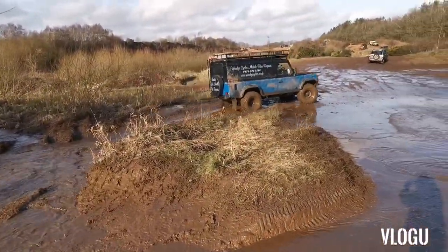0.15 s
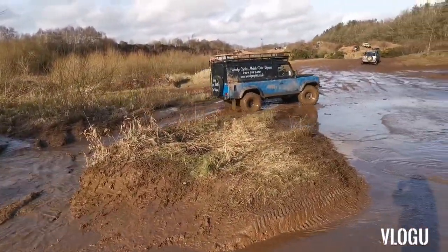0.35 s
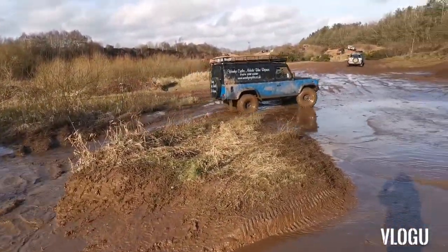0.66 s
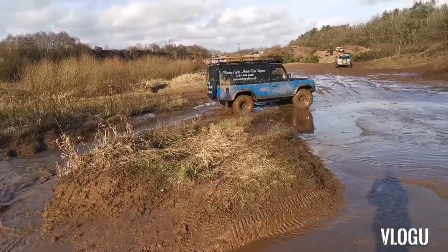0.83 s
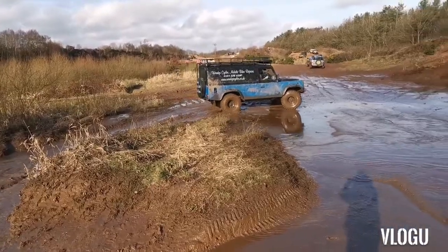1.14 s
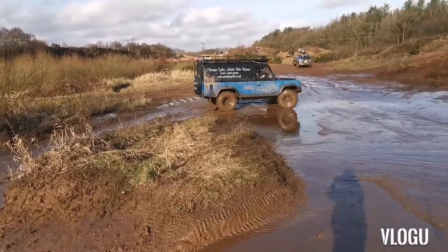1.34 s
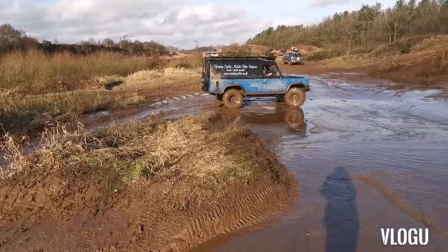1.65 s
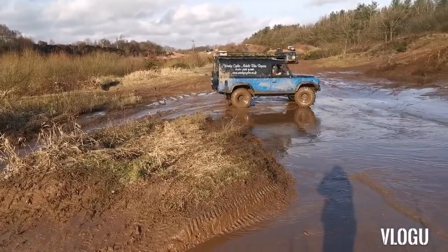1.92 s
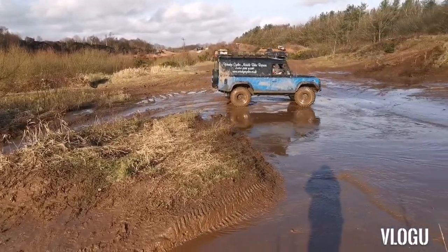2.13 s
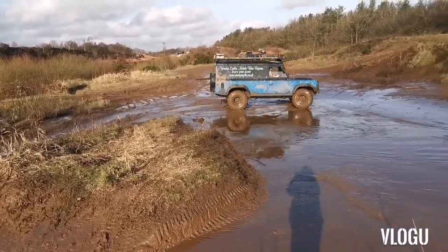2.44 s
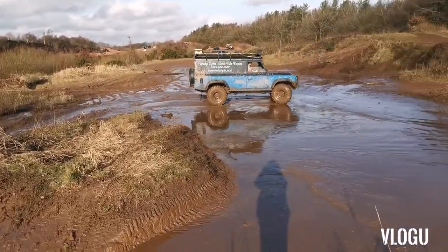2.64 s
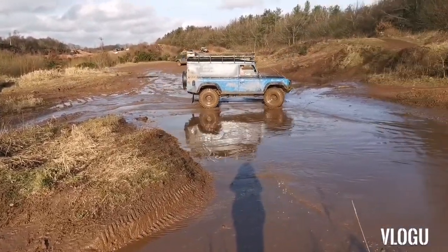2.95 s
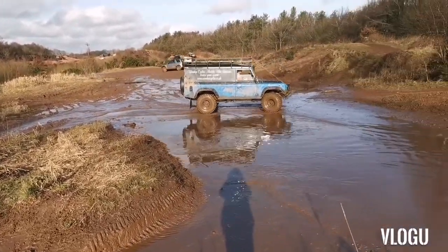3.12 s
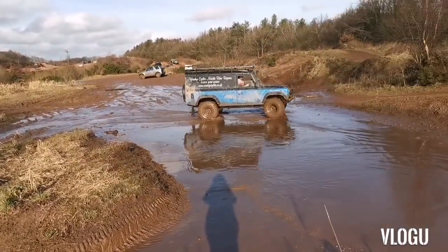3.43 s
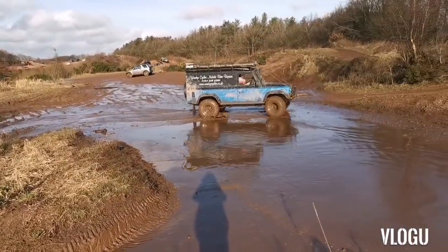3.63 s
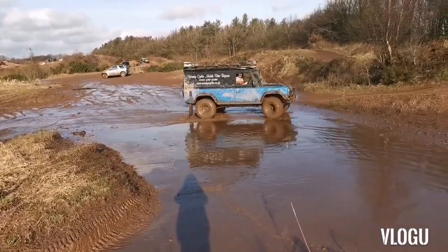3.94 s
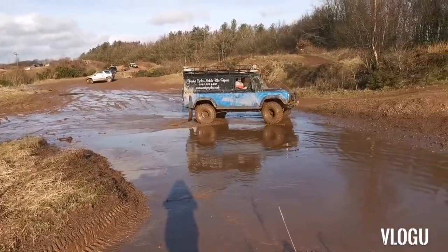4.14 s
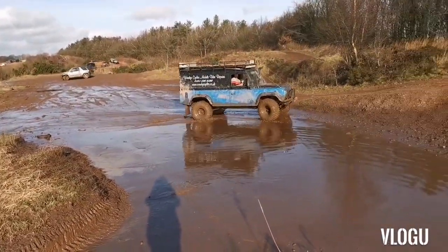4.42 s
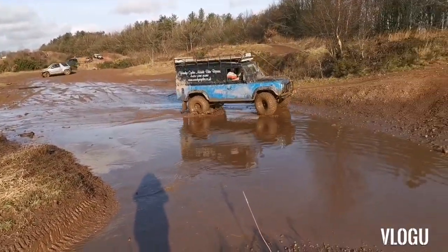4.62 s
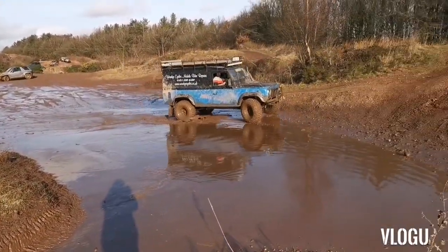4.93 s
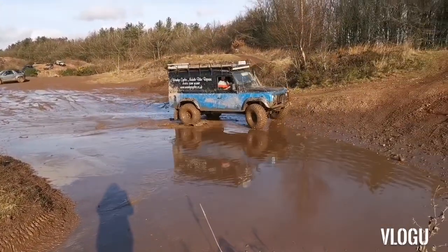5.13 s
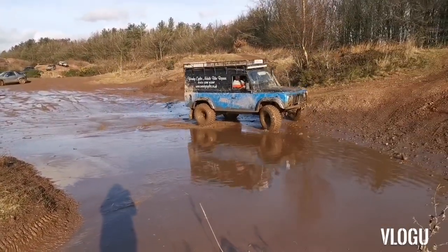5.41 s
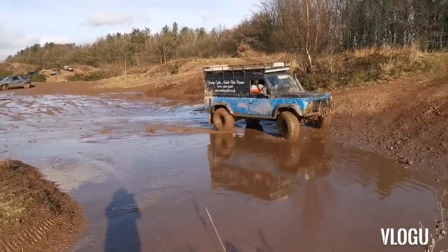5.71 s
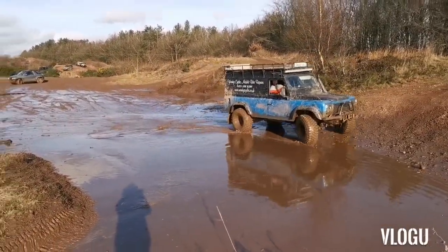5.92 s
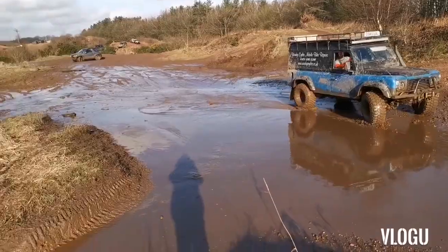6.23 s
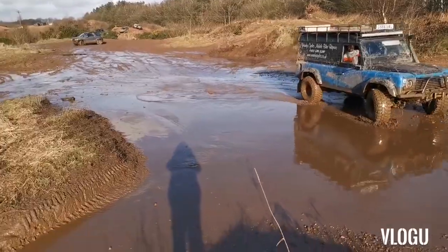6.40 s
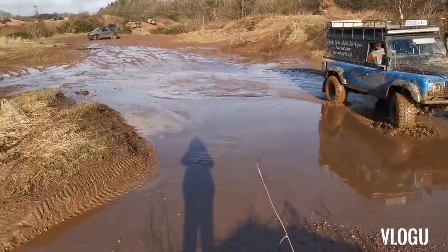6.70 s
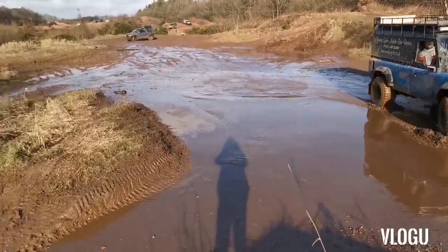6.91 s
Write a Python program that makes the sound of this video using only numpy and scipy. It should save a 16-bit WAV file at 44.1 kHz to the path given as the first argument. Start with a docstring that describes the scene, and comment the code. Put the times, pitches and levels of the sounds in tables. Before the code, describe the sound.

A heavy diesel engine strains and rises, clattering and booming, over wet hiss from the wheels. After the peak it sinks through a brief drone to a subdued low throb, wading slowly. Small water ticks and muffled mud knocks dot the sound; near the end the engine firms up slightly as the vehicle turns toward the microphone. Dry open-air sound with faint low distant hum.

```python
"""Mud and a shallow pool in the open: a diesel four-wheel drive pulls out, lifts off and wades slowly, turning
towards the microphone. Cosines at multiples of the firing rate make the exhaust note; cosines at pitches of
their own make a drone and a growl; noise gated by each combustion, then filtered, makes rumble, boom, engine
clatter, wash and spray. Struck resonances make the knock, short damped bursts the mud slaps and drops; tones
hum in the distance."""
import sys
import numpy as np
from scipy import signal
from scipy.fft import rfft, irfft, next_fast_len
from scipy.io import wavfile

SR = 44100
rng = np.random.default_rng(int(sys.argv[2]) if len(sys.argv) > 2 else 0)


def wav_record(signal):
    """Record a signal, one row per channel, as 16-bit PCM in the file named by sys.argv[1]."""
    frames = np.transpose(np.atleast_2d(signal))
    bounded = np.clip(frames, -1, 1)
    # unit amplitude maps onto the largest positive 16-bit level
    quanta = np.round(bounded * 32767).astype(np.int16)
    wavfile.write(sys.argv[1], SR, quanta)


N = 311346


def amp(db):
    """Decibel law: a level difference is 20 log10 of an amplitude ratio."""
    return 10 ** (np.asarray(db) / 20)


def rms_one(x):
    """Normalisation: scale to unit root-mean-square amplitude."""
    return x / np.sqrt(np.mean(x ** 2) + 1e-20)


def in_time(rows):
    """Linear interpolation: turn each column of a timed table into a curve over the scene."""
    start_s, *columns = np.transpose(rows)
    return [np.interp(np.arange(N) / SR, start_s, column) for column in columns]


def drift(rate_hz):
    """Low-pass random process: two equal poles near rate_hz leave slow chance of spread 1."""
    step = 40     # computed on every 40th sample, then interpolated
    pole = np.exp(-2 * np.pi * rate_hz * step / SR)
    white = rng.standard_normal(N // step + 2002)
    slow = signal.lfilter([1], [1, -2 * pole, pole * pole], white)[2000:]     # drop the settling time
    return np.interp(np.arange(N) / step, np.arange(len(slow)), rms_one(slow))


def colour(x, spectrum):
    """Linear filtering: weight the spectrum of x by a (freq_hz, gain_db) curve, then set rms 1."""
    size = next_fast_len(N)
    freq_hz, gain_db = np.transpose(spectrum)
    log_bins = np.log(np.maximum(np.arange(size // 2 + 1) * SR / size, 1))
    gain = amp(np.interp(log_bins, np.log(freq_hz), gain_db))
    return rms_one(irfft(rfft(x, size) * gain, size)[:N])


def tone(cycles, level_db, waver_db=4.5):
    """Phase alignment: a wavering cosine of given rms; multiples of one rate dip together into a pulse."""
    level = amp(level_db + waver_db * drift(25.0))
    return -np.sqrt(2) * level * np.cos(2 * np.pi * cycles)


def near(hz, ring):
    """Resonance curve: the loss in dB of a tone away from the centre frequency."""
    centre_hz, width_hz = ring
    return -20 * np.log10(1 + (2 * (hz - centre_hz) / width_hz) ** 2)


def firing_gate(cycles, depth, unevenness_db):
    """Amplitude modulation: a decaying burst after each combustion, each of its own strength."""
    strength_db = unevenness_db * rng.standard_normal(1000).clip(-2, 1.3)
    strength = amp(strength_db)[cycles.astype(int)]
    return 1 + depth * strength * np.exp(-3.0 * (cycles % 1))


def droplets(per_s, share, gate):
    """Poisson process: random droplet clicks of widely spread size over gated hiss."""
    size = amp(5.2 * np.minimum(rng.exponential(1, N), 3.0))
    clicks = (rng.random(N) < per_s / SR) * size * rng.choice([-1, 1], N)
    return rms_one(rng.standard_normal(N) * gate) + share * rms_one(clicks)


# engine speed: start_s [s], firing_hz [Hz]
ENGINE_SPEED = [(0, 51), (.15, 55.8), (.29, 60.1), (.55, 65.3), (.83, 66.5), (1.06, 71.7), (1.42, 77.3),
                (1.62, 77.5), (1.7, 83), (1.79, 85.7), (1.97, 86.5), (2.18, 88), (2.3, 83.2), (2.38, 85),
                (2.47, 90), (2.6, 78.5), (2.82, 79.3), (3.08, 72.5), (3.32, 64.6), (3.55, 58), (3.75, 58.2),
                (4, 59.4), (4.3, 56.6), (4.75, 58), (4.95, 58.6), (5.15, 56.7), (5.43, 61), (5.6, 62.7),
                (6.09, 62.3), (6.41, 61.3), (6.7, 62.2), (7.06, 63.5)]
# the two strongest exhaust tones: start_s [s], firing tone level_db [dB], second multiple level_db [dB]
FIRING_TONES = [(0, -39, -33), (.3, -38.5, -31), (.6, -29, -30), (.9, -30, -30.5), (1.1, -31.5, -27.5),
                (1.4, -28.5, -27.5), (1.62, -30.5, -29.5), (1.675, -27.5, -29.5), (1.72, -31.5, -47),
                (1.8, -27.5, -36), (1.86, -34, -29), (1.91, -30.5, -49), (1.96, -24, -42), (2.02, -38, -38),
                (2.05, -31, -24.5), (2.08, -28, -47), (2.11, -25.5, -32.5), (2.2, -33.5, -42),
                (2.25, -37, -28), (2.28, -37.5, -42), (2.35, -41, -28), (2.47, -52, -34),
                (2.53, -54, -34.5), (2.61, -57, -31), (2.66, -60, -52), (2.75, -60, -37), (2.84, -60, -32),
                (2.95, -60, -39), (3.08, -57, -55), (3.3, -55, -40.5), (3.5, -56, -41), (3.62, -55, -40.5),
                (3.71, -55, -35.5), (3.8, -56, -43), (3.88, -58, -35), (3.95, -59, -49), (4.05, -58, -39),
                (4.16, -58, -39), (4.25, -59, -45), (4.42, -56, -42), (4.52, -55, -43.5),
                (4.65, -56, -41.5), (4.73, -53, -49), (4.8, -52, -44), (4.9, -51, -47), (5.05, -53, -39.5),
                (5.1, -50, -47), (5.2, -42, -41.5), (5.33, -41, -42), (5.42, -42, -35.5), (5.55, -45, -41),
                (5.65, -42, -41), (5.85, -46, -44), (6.15, -58, -41.5), (6.28, -47, -57), (6.4, -39.5, -49),
                (6.7, -35, -50), (6.92, -38.5, -58), (7.06, -43, -49)]
# the belt-geared pair swells twice: peak_s [s], half_length_s [s], level_db [dB]
BELT_SWELLS = [(1.484, 0.2, -40.5), (3.15, 0.25, -41.5)]
BELT_LEAST_DB = -62
UPPER_SWELL_DB, UPPER_SWELL_HZ = 1.2, 1.9     # slow coming and going of the weaker tones
# the weaker multiples follow the firing tone; each is strongest near its resonance (centre Hz, width Hz)
THIRD_BELOW_FIRST_DB, THIRD_LEAST_DB, THIRD_RING = 10, -48.5, (189, 88)     # least before resonance loss
FOURTH_BELOW_FIRST_DB, FOURTH_RING = 19.5, (311, 47)
FIFTH_BELOW_FIRST_DB, FIFTH_RING = 22, (352, 50)


def exhaust():
    """Harmonic series shaped by pipe resonances: firing multiples, plus a pair geared to them by a belt."""
    firing_hz, = in_time(ENGINE_SPEED)
    first, second = in_time(FIRING_TONES)
    cycles = np.cumsum(firing_hz * (1 + .002 * drift(6))) / SR     # the crank speed hunts
    t = np.arange(N) / SR

    third = np.maximum(first - THIRD_BELOW_FIRST_DB, THIRD_LEAST_DB) + near(3 * firing_hz, THIRD_RING)
    fourth = first - FOURTH_BELOW_FIRST_DB + near(4 * firing_hz, FOURTH_RING)
    fifth = first - FIFTH_BELOW_FIRST_DB + near(5 * firing_hz, FIFTH_RING)
    swells = [db - 6 * ((t - peak_s) / half_s) ** 4 for peak_s, half_s, db in BELT_SWELLS]
    belt = np.max(swells, axis=0).clip(BELT_LEAST_DB)
    third, fourth, fifth, belt = (
        db + UPPER_SWELL_DB * drift(UPPER_SWELL_HZ) for db in (third, fourth, fifth, belt))

    levels = [first, second, third, fourth, fifth]
    series = sum(tone((k + 1) * cycles, db, waver_db=.4 + .4 * k) for k, db in enumerate(levels))
    belt_pair = tone(4 / 3 * cycles, belt - 3) + tone(8 / 3 * cycles, belt, waver_db=3)
    return series + belt_pair, cycles


# start_s [s], rumble level_db [dB], silencer boom level_db [dB];
# the boom opens strong, sinks, then swells unevenly and drops sharply at 2.66 s
LOW_LEVELS = [(0, -43.5, -33), (.7, -35.5, -49), (1.5, -36.5, -38.5), (1.72, -38, -39.5), (2.1, -35.5, -32),
              (2.4, -39.5, -41.5), (2.62, -38, -28), (2.66, -45, -41), (3, -45, -39), (3.3, -44, -38),
              (3.6, -44.5, -42), (4.2, -45.5, -41.5), (5, -42.5, -46), (5.6, -42, -46), (5.9, -42, -40),
              (6.2, -44, -40), (6.6, -43.5, -38), (7.06, -43.5, -44)]
# bands just below and just above the boom: start_s [s], below level_db [dB], above level_db [dB]
FLANK_LEVELS = [(0, -61, -40.5), (.4, -63, -60), (3.3, -54, -59), (3.7, -52, -51), (4.2, -59, -47),
                (4.7, -47, -58), (5.9, -49, -55), (6.4, -45, -49.5), (7.06, -46.5, -57)]
# colour of the low rumble: freq_hz [Hz], gain_db [dB, relative]
RUMBLE_COLOUR = [(25, -18), (50, -1), (90, 1), (130, -1), (200, -2.5), (250, -10), (320, -21), (500, -45),
                 (2000, -120)]
# colour of the silencer boom: freq_hz [Hz], gain_db [dB, relative]
BOOM_COLOUR = [(90, -32), (135, -3), (160, -1), (185, 2.5), (205, -5), (230, -30.5), (300, -60),
               (2000, -120)]
# colour of the band just below the boom: freq_hz [Hz], gain_db [dB, relative]
BELOW_BOOM_COLOUR = [(100, -41), (135, -10.5), (150, 3), (165, -7.5), (200, -43), (2000, -120)]
# colour of the band just above the boom: freq_hz [Hz], gain_db [dB, relative]
ABOVE_BOOM_COLOUR = [(170, -44), (215, 3.5), (240, -1.5), (262, -3), (310, -38.5), (2000, -120)]


def rumble_and_boom(cycles):
    """Band-filtered flow noise: exhaust gas pulsed by each combustion, in four low bands."""
    gas = rng.standard_normal((4, N)) * firing_gate(cycles, depth=0.62, unevenness_db=-3.0)
    levels = in_time(LOW_LEVELS) + in_time(FLANK_LEVELS)
    colours = [RUMBLE_COLOUR, BOOM_COLOUR, BELOW_BOOM_COLOUR, ABOVE_BOOM_COLOUR]
    return sum(amp(db) * colour(noise, band) for db, noise, band in zip(levels, gas, colours))


# distant tones at full level: pitch_hz [Hz], level_db [dB]
HUM_TONES = [(98, -51.5), (147, -57), (181, -48.5), (203, -51), (265, -65.5)]
HUM_RISE_S, HUM_RISE_DB = (3, 3.66), 0.5     # comes up to full level between these times


def hum():
    """Superposition of pure tones: fixed pitches, each swelling and sinking by itself."""
    t = np.arange(N) / SR
    rise_db = np.interp(t, HUM_RISE_S, [-HUM_RISE_DB, 0])
    return amp(rise_db) * sum(tone(hz * t, db + 3.8 * drift(1.24), waver_db=2.5) for hz, db in HUM_TONES)


# body resonances: pitch_hz [Hz], width_hz [Hz], lift_db [dB, mean]
PANEL_RESONANCES = [(696, 250, 2.5), (1010, 110, 1), (1372, 183, 5), (2140, 150, 1.5), (2820, 310, 4),
                    (3380, 220, 1.5)]


def panels(x):
    """Panel resonance: each mode lifts a narrow band that comes and goes by chance, independently."""
    for hz, width_hz, db in PANEL_RESONANCES:
        lift = amp(db + 0.72 * drift(8.9)) - 1
        x = x + lift * signal.lfilter(*signal.iirpeak(hz, hz / width_hz, SR), x)
    return x


# the vehicle turns: start_s [s], heading [0 tail-on, 1 rear, 2 rear quarter, 3 side, 4 broadside,
# 5 front quarter, 6 nose-on]
HEADING = [(0, 0), (.4, 0), (.6, 1), (1.05, 1), (1.25, 2), (1.8, 2), (2.3, 3), (3, 3), (3.4, 4), (5.75, 4),
           (5.95, 4.6), (6.08, 4.7), (6.22, 5), (6.44, 5), (6.56, 6), (7.06, 6)]


def facing(view):
    """Linear crossfade: the share of one numbered view as the vehicle turns."""
    heading, = in_time(HEADING)
    return np.clip(1 - abs(heading - view), 0, 1)


# start_s [s], upper band of clatter and wash level_db [dB], spray level_db [dB]
WET_LEVELS = [(0.0, -38.5, -50), (0.29, -37.5, -53), (1.16, -39, -55.5), (1.65, -41, -51),
              (1.67, -40.5, -52.5), (1.75, -41, -51), (1.99, -42, -53.5), (2.16, -41.5, -52),
              (2.36, -42, -52.5), (3.01, -43.5, -57), (3.05, -42.5, -55), (3.24, -43.5, -60.5),
              (3.42, -45.5, -58), (3.68, -44, -57.5), (3.72, -44.5, -52), (3.78, -44, -56.5),
              (3.93, -45.5, -56.5), (4.01, -44.5, -54), (4.13, -44.5, -56.5), (4.74, -43, -53),
              (4.8, -44.5, -55), (4.84, -43.5, -55.5), (5.48, -43.5, -54.5), (5.52, -41.5, -51),
              (5.56, -43.5, -54), (5.72, -42, -54.5), (5.74, -46, -54), (5.76, -41.5, -55.5),
              (5.96, -44, -53.5), (5.98, -43, -52.5), (6.23, -40, -53), (6.74, -43, -55.5),
              (6.96, -42.5, -52), (7.06, -44.5, -52.5)]
WASH_FULL_DB = 2     # the whole clatter and wash is this much above its upper band
# colour of clatter and wash, tail-on: freq_hz [Hz], gain_db [dB, relative]
TAIL = [(180, -42), (300, -11), (384, 0), (422, -6), (560, -3.5), (760, -7), (929, -3.5), (1290, -6),
        (1400, -4.5), (1690, -4.5), (2040, -2), (5000, -16), (6500, -19), (11000, -120)]
# the same from the rear: freq_hz [Hz], gain_db [dB, relative]
REAR = [(180, -14), (300, -7.5), (334, -8), (403, -2), (510, -4), (692, -7.5), (855, -2.5), (1020, -2),
        (1160, -8), (1390, -8), (1700, -7.5), (2410, -5), (2900, -11.5), (3800, -12), (4500, -18.5),
        (5000, -18), (6500, -32), (11000, -120)]
# the same from the rear quarter: freq_hz [Hz], gain_db [dB, relative]
QUARTER = [(180, -13), (300, -8), (334, -5.5), (371, -4.5), (403, -3.5), (510, -4), (692, -9), (855, -0.5),
           (1020, -4.5), (1160, -6.5), (1390, -7.5), (1500, -7.5), (2410, -9), (4500, -21.5), (5000, -26),
           (6500, -48), (11000, -120)]
# the same from the side: freq_hz [Hz], gain_db [dB, relative]
SIDE_ON = [(180, -43), (300, -5), (389, -0.5), (510, -8), (573, -1), (676, -10.5), (725, -4.5), (1420, -5),
           (2070, -4.5), (2330, -8), (2810, -6), (3090, -13.5), (3390, -9.5), (4240, -18.5), (5000, -19),
           (6500, -33), (11000, -120)]
# the same broadside: freq_hz [Hz], gain_db [dB, relative]
BROADSIDE = [(180, -34), (300, -4.5), (334, -5), (407, -8.5), (475, -6), (560, -6.5), (668, -2),
             (886, -5.5), (1130, -6.5), (1320, -3.5), (1520, -7.5), (1750, -10), (2070, -6.5), (2350, -8),
             (2720, -7), (3100, -10), (3470, -10), (4050, -13.5), (4660, -24.5), (5000, -20.5), (6500, -37),
             (11000, -120)]
# the same from the front quarter: freq_hz [Hz], gain_db [dB, relative]
FRONT = [(180, -37), (300, -6), (528, -9.5), (652, -4.5), (974, -7.5), (1030, -11), (1250, -6.5),
         (1770, -12), (1970, -5.5), (2170, -17), (2400, -2), (2750, -3), (3000, -8), (3300, -16),
         (3730, -22.5), (4150, -22.5), (5000, -21), (6500, -53), (11000, -120)]
# the same nose-on: freq_hz [Hz], gain_db [dB, relative]
NOSE = [(180, -30), (300, -1), (437, -9.5), (480, -8), (580, -3.5), (769, -2), (1110, -6), (1440, -5),
        (2000, -12), (2250, -3), (2590, -3.5), (3010, -10), (3470, -25), (4290, -13), (5000, -19),
        (6500, -61), (11000, -120)]


def clatter_and_wash(cycles, surge):
    """Directivity: combustion clatter and wading take the colour of the side facing the microphone."""
    upper_band_db, _ = in_time(WET_LEVELS)
    gate = firing_gate(cycles, depth=0.25, unevenness_db=6.0)
    source = panels(droplets(900, 0.37, gate) * amp(0.44 * surge))
    views = [TAIL, REAR, QUARTER, SIDE_ON, BROADSIDE, FRONT, NOSE]
    turned = sum(facing(k) * colour(source, view) for k, view in enumerate(views))
    return amp(upper_band_db + WASH_FULL_DB) * turned


# colour of the spray away from the flank: freq_hz [Hz], gain_db [dB, relative]
SPRAY_COLOUR = [(3500, -52), (4700, -11.5), (5500, 1), (5900, -2.5), (6500, -3), (7150, 2), (7800, -5.5),
                (8200, -14.5), (9600, -18), (10500, -28.5), (12000, -31.5), (15200, -36)]
# colour of the spray seen side-on: freq_hz [Hz], gain_db [dB, relative]
SPRAY_SIDE_ON = [(3500, -52), (4700, -11), (5300, 2), (5700, -1), (6200, -5.5), (7150, 0), (7800, -5.5),
                 (8200, -14), (9600, -17), (10500, -28), (12000, -31), (15200, -39)]
# colour of the spray seen broadside: freq_hz [Hz], gain_db [dB, relative]
SPRAY_BROADSIDE = [(3500, -51), (4700, -14), (5300, -2.5), (5750, 1), (6400, -5.5), (7150, 0.5),
                   (7800, -6.5), (8200, -14.5), (9600, -17.5), (10500, -27), (12000, -31.5), (15200, -39)]


def spray(cycles, surge):
    """Directivity of droplet noise: fine spray shifts colour while the flank faces the microphone."""
    _, level_db = in_time(WET_LEVELS)
    gate = firing_gate(cycles, depth=0.17, unevenness_db=12.5)
    source = droplets(2500, 0.43, gate) * amp(0.5 * surge)
    side_on, broadside = facing(3), facing(4)
    turned = side_on * colour(source, SPRAY_SIDE_ON) + broadside * colour(source, SPRAY_BROADSIDE)
    turned = turned + (1 - side_on - broadside) * colour(source, SPRAY_COLOUR)
    return amp(level_db) * turned


# finest, highest hiss: start_s [s], level_db [dB]
MIST_LEVEL = [(0, -76), (.7, -82), (1.6, -94), (3.4, -77), (4.6, -77), (6, -74), (6.8, -70), (7.06, -64)]
MIST_HZ = 10000     # lower edge


def mist():
    """High-pass filtering of white noise: a smooth hiss at the very top."""
    level_db, = in_time(MIST_LEVEL)
    high_pass = signal.butter(4, MIST_HZ, "high", fs=SR, output="sos")
    return amp(level_db) * rms_one(signal.sosfilt(high_pass, rng.standard_normal(N)))


# larger drops in the spray: start_s [s], level_db [dB, before a 7 dB cut]
DROP_TICKS = [(0.1045, -39), (1.351, -37), (1.8143, -40), (2.093, -39), (2.2184, -42), (2.8095, -38),
              (3.3328, -49), (3.9958, -40), (4.8773, -38), (5.0844, -38), (5.1814, -45), (5.2769, -43),
              (5.8202, -38), (5.932, -40), (6.4278, -38.5)]
DROP_S = 0.0035     # decay time constant


def drops():
    """Transient envelope: ticks with a soft half-millisecond rise, then a decay, in a duller spray colour."""
    shape, t = np.zeros(N), np.arange(600) / SR
    tick = np.exp(-t / DROP_S) * np.clip(t / .0005, 0, 1)
    for start_s, db in DROP_TICKS:
        shape[round(start_s * SR):][:len(t)] += amp(db - 7) * tick
    return shape * colour(rng.standard_normal(N), SPRAY_COLOUR[:-3] + [(10500, -60)])     # no very top


# combustion knock under load, in bursts: start_s [s], level_db [dB]
KNOCK_LEVEL = [(.4, -70), (.5, -50), (.57, -41), (.62, -48), (.88, -47), (.93, -43), (.96, -48),
               (1.01, -41), (1.06, -48), (1.12, -45), (1.25, -49), (1.3, -42), (1.34, -49), (1.4, -43),
               (1.47, -46), (1.7, -48), (2.05, -50), (2.3, -70)]
# engine block resonances: pitch_hz [Hz], t60_s [s], level_db [dB, relative to each other]
KNOCK_RINGS = [(890, 0.022, 2.5), (1003, 0.028, 9.5), (2340, 0.0073, -6)]
KNOCK_BURST_S = .002     # decay time constant of a blow, a short puff of noise


def knock(cycles):
    """Struck resonator: each combustion excites the engine block's modes with a strength of its own."""
    level_db, = in_time(KNOCK_LEVEL)
    fires, out = np.diff(np.floor(cycles), prepend=0), 0
    burst_decay = np.exp(-1 / (KNOCK_BURST_S * SR))
    for hz, t60_s, db in KNOCK_RINGS:
        radius, angle = amp(-60 / (t60_s * SR)), 2 * np.pi * hz / SR
        blows = fires * amp(2.5 * rng.standard_normal(N).clip(-2, 2)) + 1e-18
        puffs = signal.lfilter([1], [1, -burst_decay], blows) * rng.standard_normal(N)
        ring = signal.lfilter([1], [1, -2 * radius * np.cos(angle), radius * radius], puffs)
        out = out + amp(db) * rms_one(ring)
    return amp(level_db) * rms_one(out)


# mud on the panels: start_s [s], level_db [dB, main cosine at onset before the low-pass], pitch_hz [Hz]
MUD_SLAPS = [(.57, -25, 950), (.675, -27, 1000), (1.454, -26, 1000), (3.097, -31, 1000), (3.53, -30, 1100),
             (3.848, -32, 1000), (4.27, -31, 1300), (4.702, -31, 900), (4.714, -32, 800), (4.732, -28, 750),
             (5.187, -32, 780), (5.29, -30, 1000), (5.755, -33, 1000), (6.0376, -23.5, 900),
             (6.066, -27, 900), (6.401, -28, 700), (6.428, -30, 1000)]


def slaps():
    """Damped oscillation: short knocks, low-passed so that they are dull at this distance."""
    out, t = np.zeros(N), np.arange(600) / SR
    for start_s, db, hz in MUD_SLAPS:
        blow = np.cos(2 * np.pi * hz * t) + 0.33 * np.cos(2 * np.pi * 2600 * t)
        blow = blow + 0.3 * rng.standard_normal(len(t))
        out[round(start_s * SR):][:len(t)] += amp(db) * blow * np.exp(-t / .0012)
    return signal.sosfilt(signal.butter(4, 3500, fs=SR, output="sos"), out)


# a drone that climbs with road speed, then holds: start_s [s], pitch_hz [Hz], level_db [dB],
# octave level_db [dB], one-and-a-half multiple level_db [dB]
DRONE_TONES = [(1.2, 49.4, -65, -48, -56), (1.7, 49.8, -60, -42, -57), (2.249, 67.5, -46, -40.5, -53),
               (2.65, 69.64, -44, -41.5, -41), (3, 68, -37.5, -50, -45), (3.07, 68.4, -42, -39, -55),
               (3.3, 67.56, -49, -48, -50)]


def drone():
    """Simple frequency ratios: three tones at 1, 3/2 and 2 times one pitch fade in and out."""
    hz, first, octave, between = in_time(DRONE_TONES)
    cycles, t = np.cumsum(hz) / SR, np.arange(N) / SR
    to_nearest_end = np.minimum(t - DRONE_TONES[0][0], DRONE_TONES[-1][0] - t)
    gate = np.clip(to_nearest_end / 0.082, 0, 1)     # fade length in s
    parts = [(1, first), (3 / 2, between), (2, octave)]
    return gate * sum(tone(ratio * cycles, db, waver_db=1.5) for ratio, db in parts)


# a higher strand of the growl around the throttle lift: start_s [s], pitch_hz [Hz], level_db [dB]
GROWL_STRAND = [(2.4, 184.2, -59), (2.5, 190.7, -29.5), (2.58, 191, -34.5), (2.64, 196.6, -38),
                (2.7, 199.5, -44), (2.95, 202.2, -43), (3.15, 193.2, -38.5), (3.3, 187.6, -68)]


def growl():
    """Frequency glide: phase is the integral of pitch, here of one tone above the second multiple."""
    hz, level_db = in_time(GROWL_STRAND)
    t = np.arange(N) / SR
    sounding = (t > GROWL_STRAND[0][0]) * (t < GROWL_STRAND[-1][0])
    return sounding * tone(np.cumsum(hz) / SR, level_db, waver_db=.8)


def scene():
    """Superposition in the open: the pressures of all sources add, with no reflections."""
    tones, cycles = exhaust()
    surge = drift(22.0)     # clatter, wash and spray surge together at random
    engine = tones + rumble_and_boom(cycles) + knock(cycles) + drone() + growl()
    wet = clatter_and_wash(cycles, surge) + spray(cycles, surge) + mist() + drops() + slaps()
    return (engine + hum() + wet)[None]


CUTOFF_HZ = 15800     # stopband edge


def record(dry):
    """Band limitation: a steep low-pass filter cuts the top."""
    return signal.sosfilt(signal.cheby2(12, 70, CUTOFF_HZ, fs=SR, output="sos"), dry)


dry = scene()
out = record(dry)
wav_record(out)
```